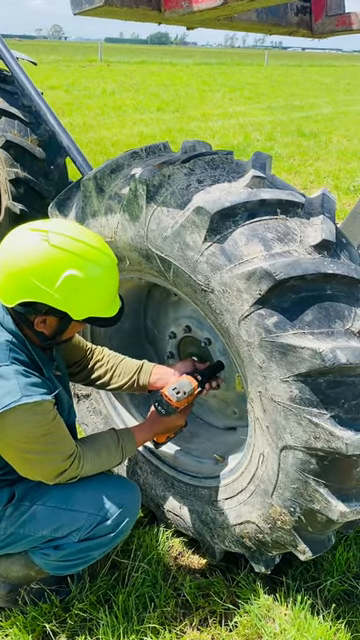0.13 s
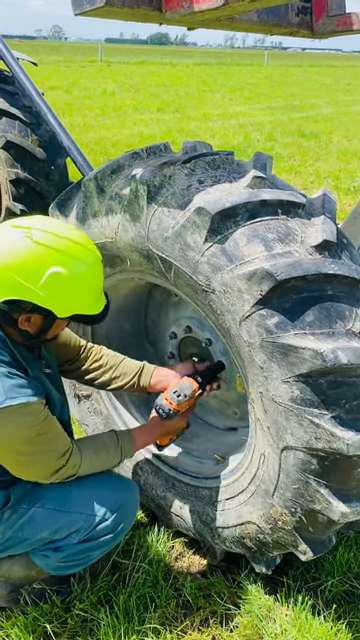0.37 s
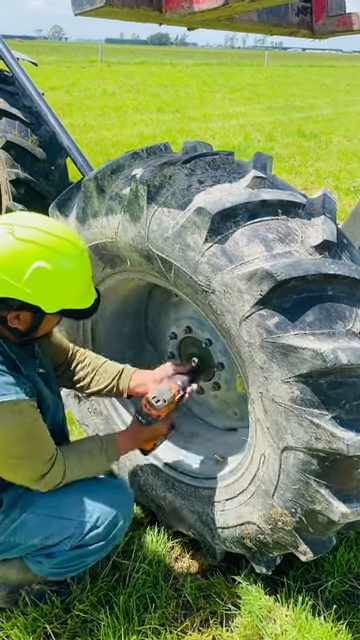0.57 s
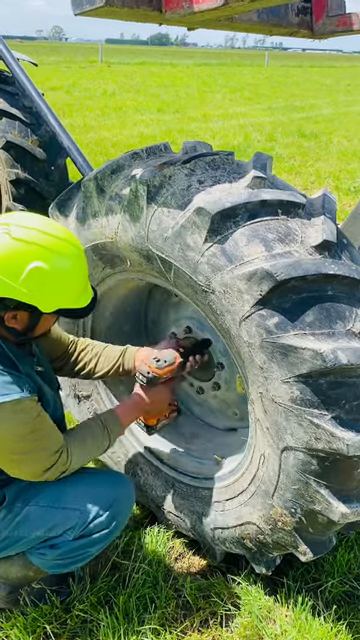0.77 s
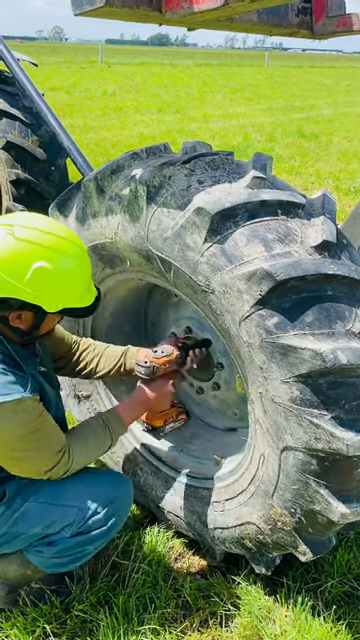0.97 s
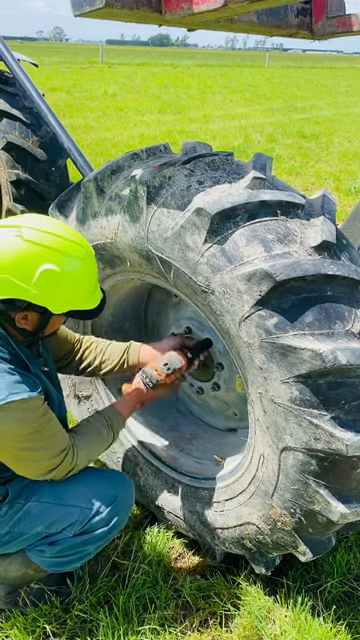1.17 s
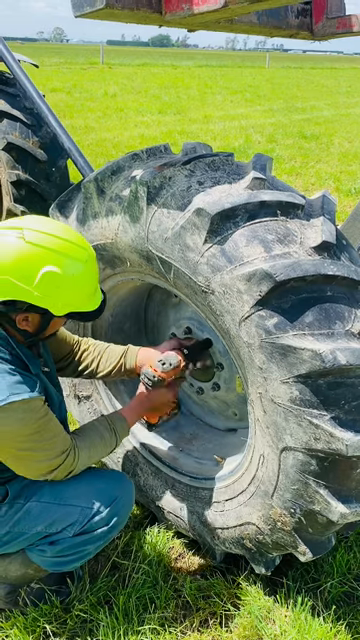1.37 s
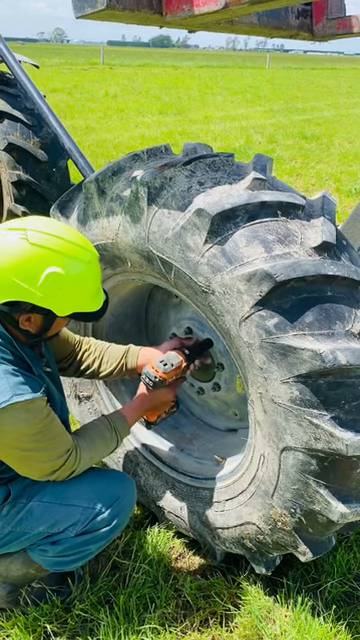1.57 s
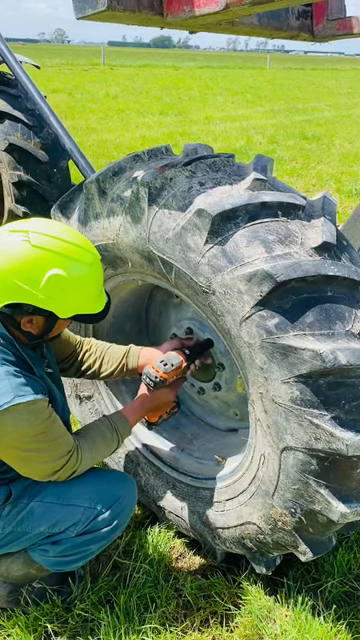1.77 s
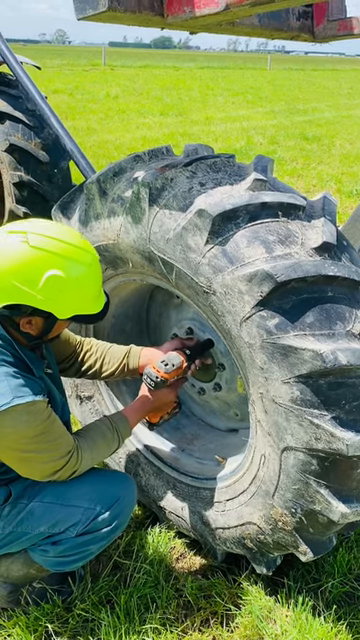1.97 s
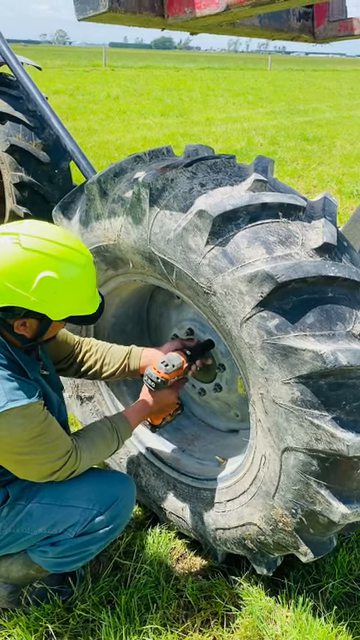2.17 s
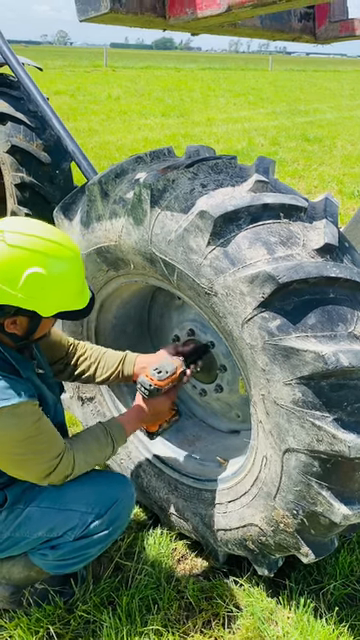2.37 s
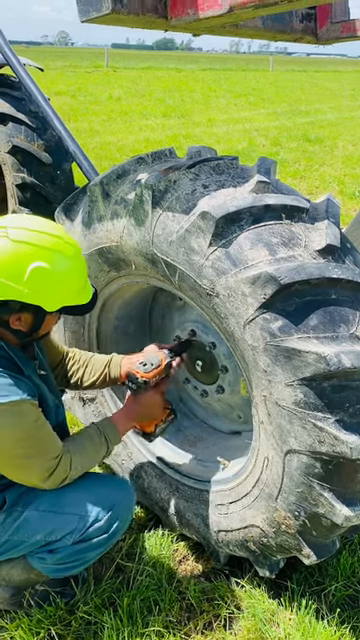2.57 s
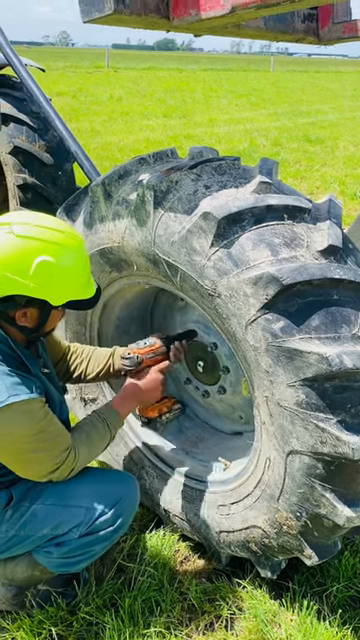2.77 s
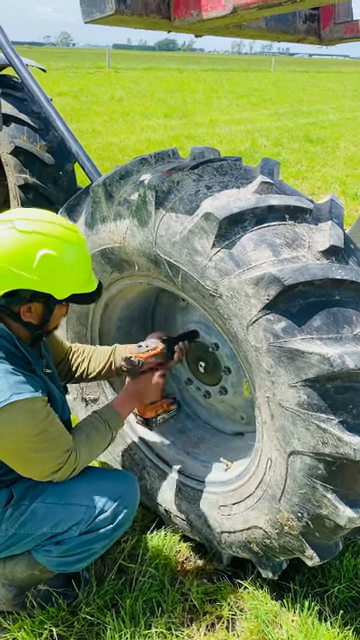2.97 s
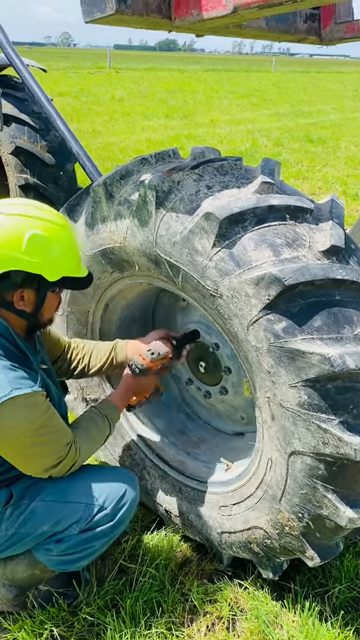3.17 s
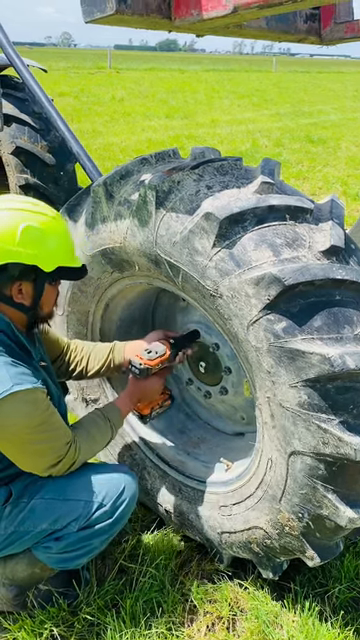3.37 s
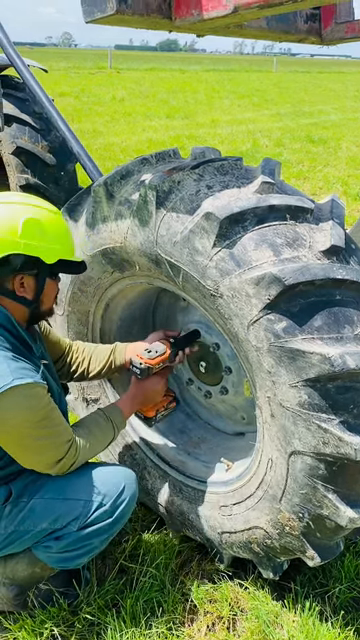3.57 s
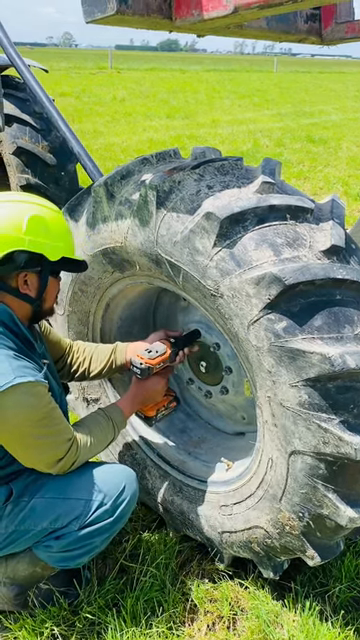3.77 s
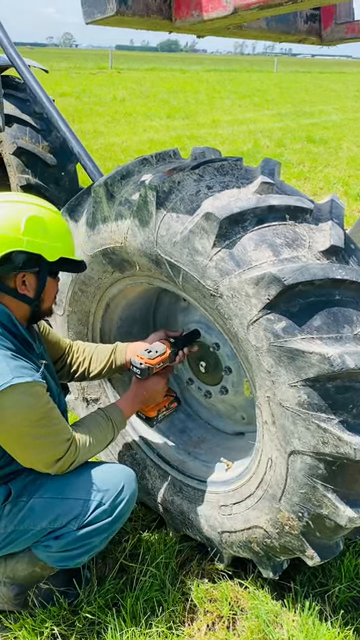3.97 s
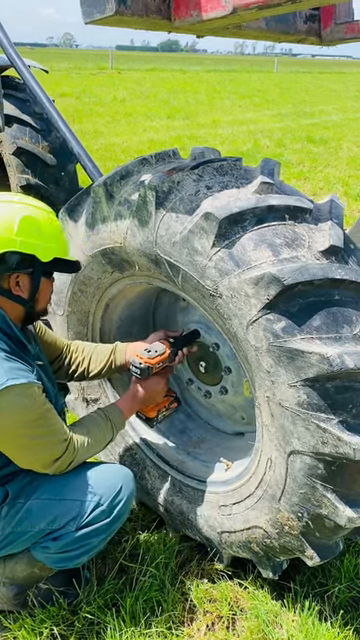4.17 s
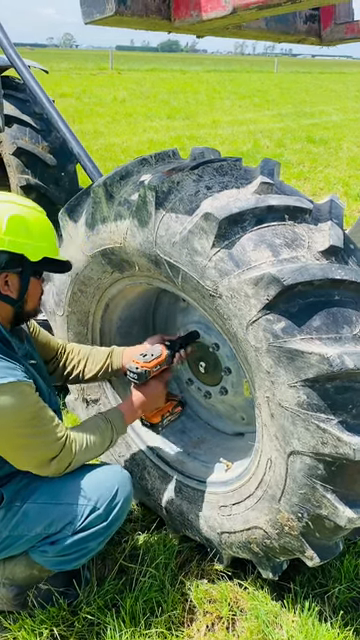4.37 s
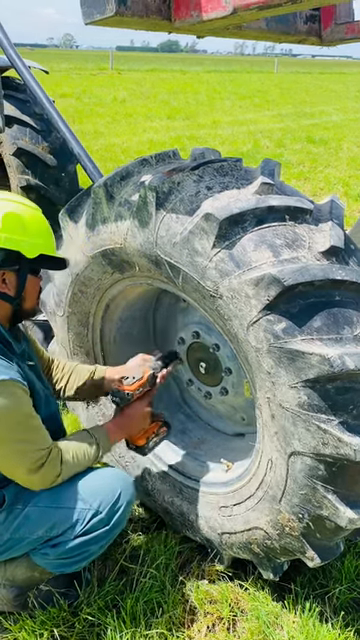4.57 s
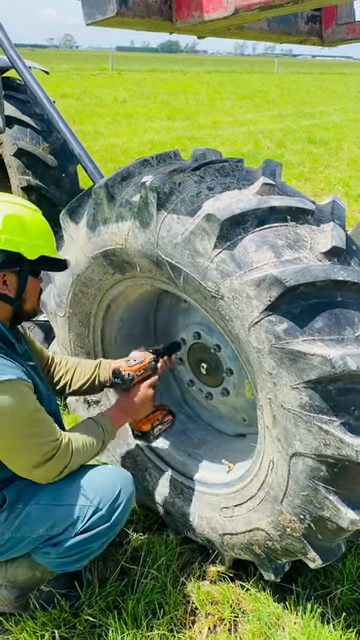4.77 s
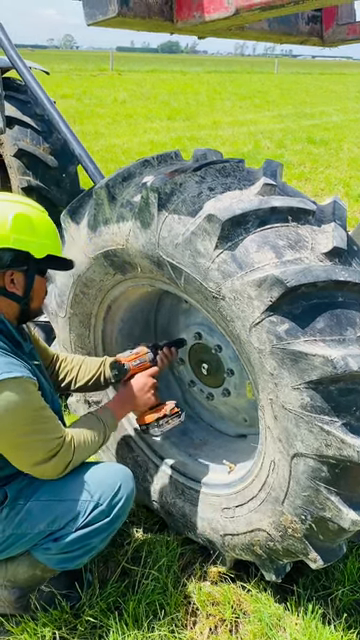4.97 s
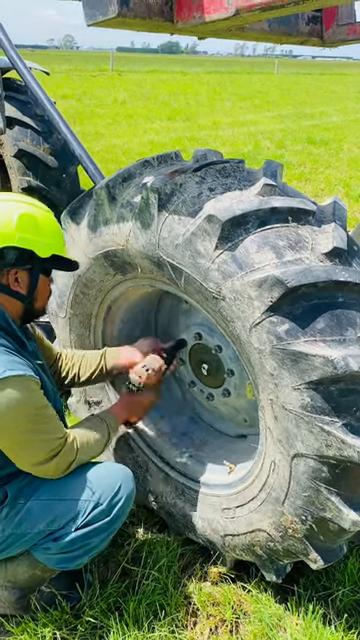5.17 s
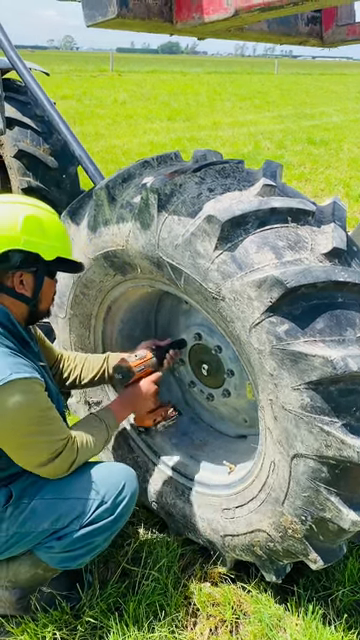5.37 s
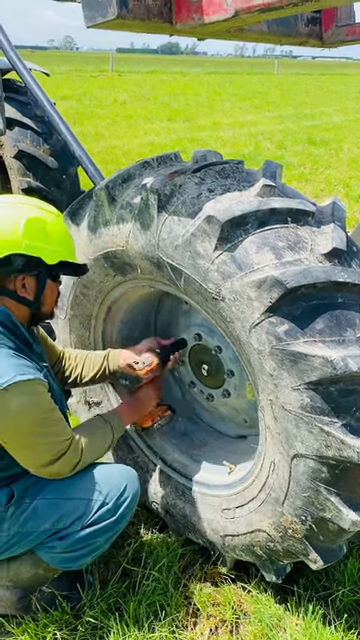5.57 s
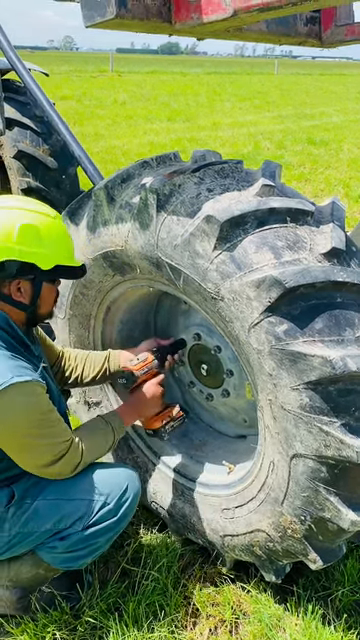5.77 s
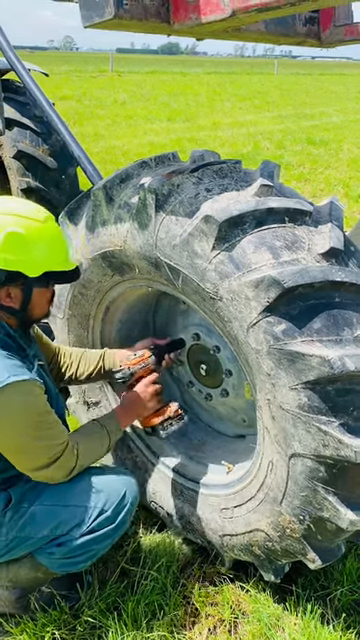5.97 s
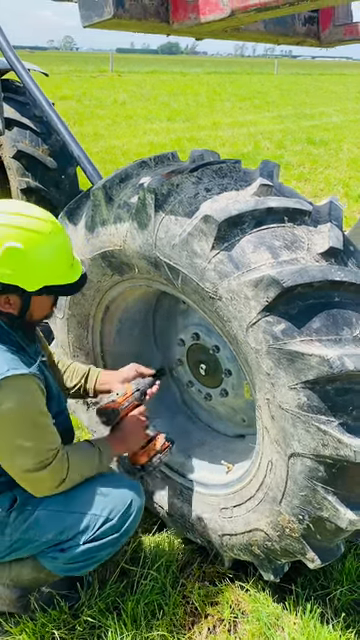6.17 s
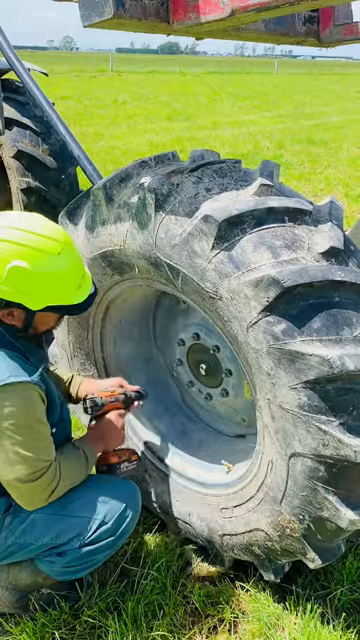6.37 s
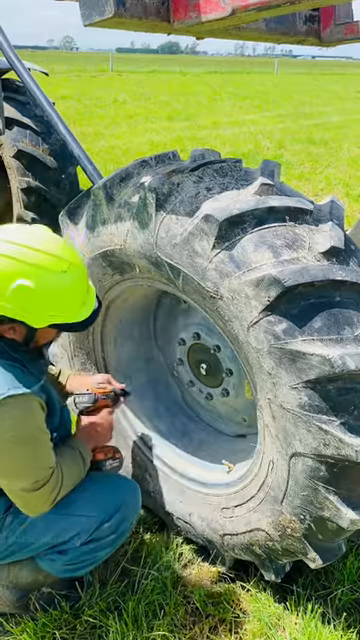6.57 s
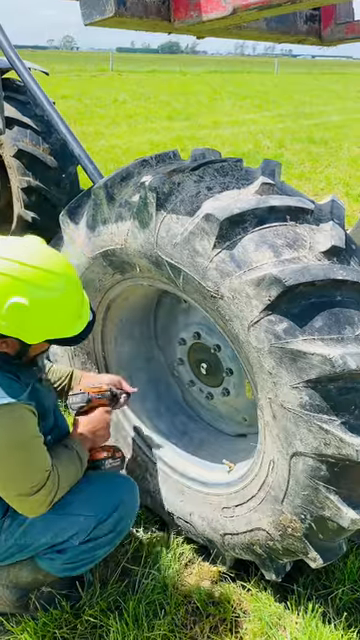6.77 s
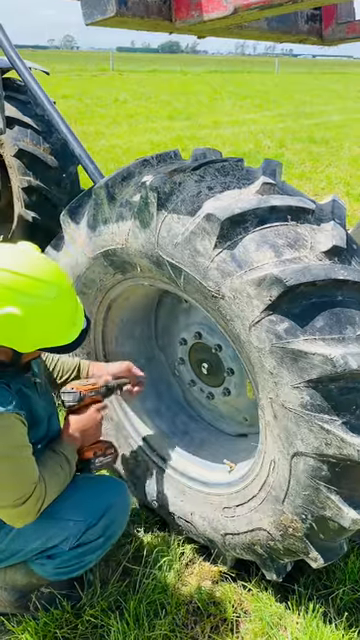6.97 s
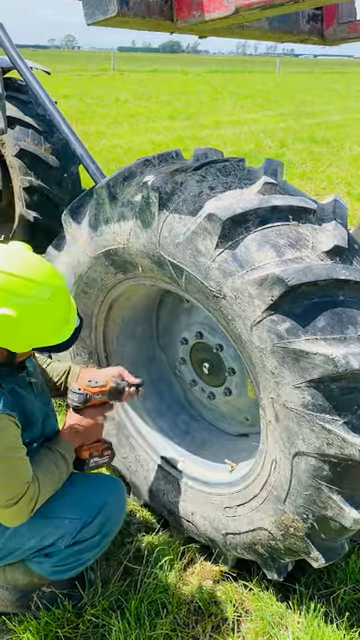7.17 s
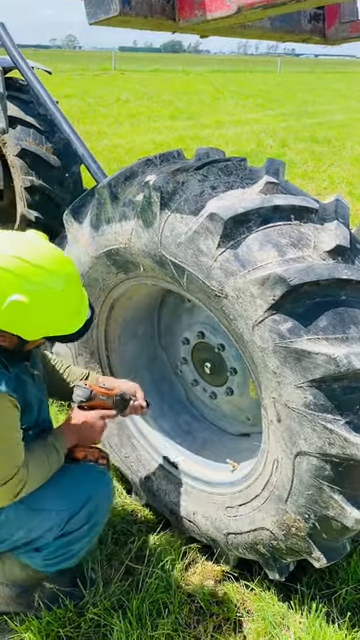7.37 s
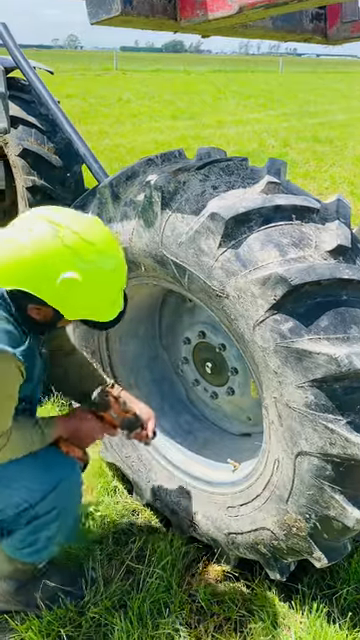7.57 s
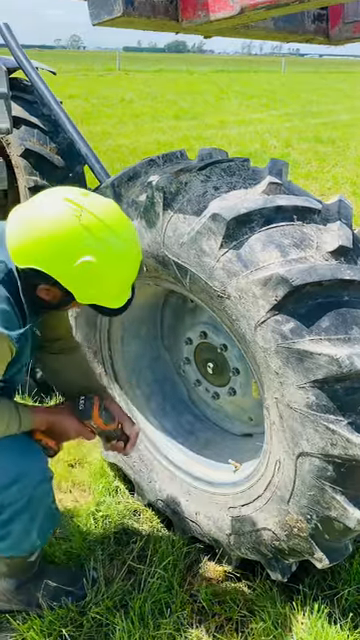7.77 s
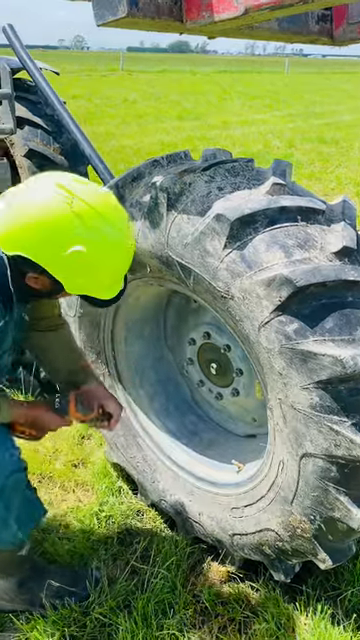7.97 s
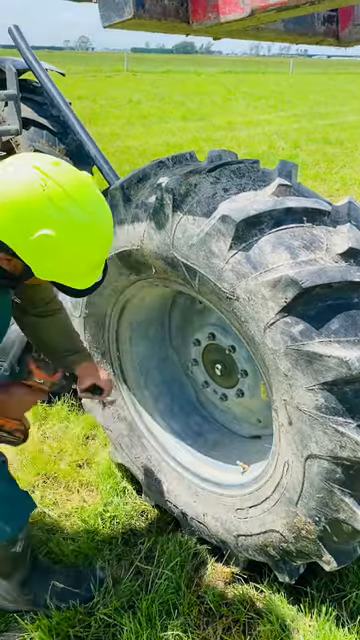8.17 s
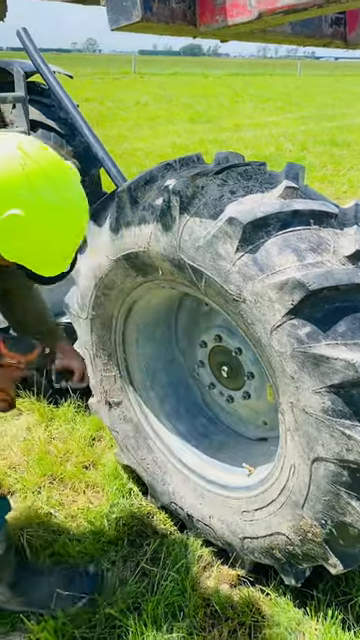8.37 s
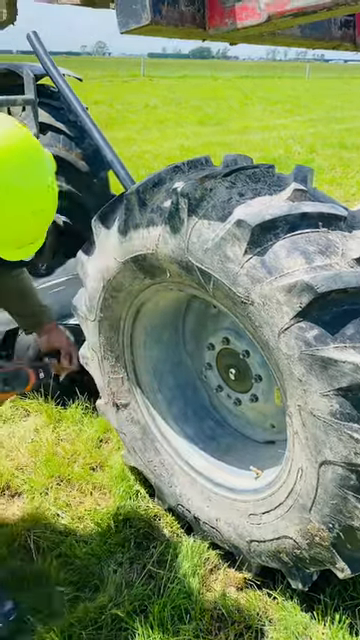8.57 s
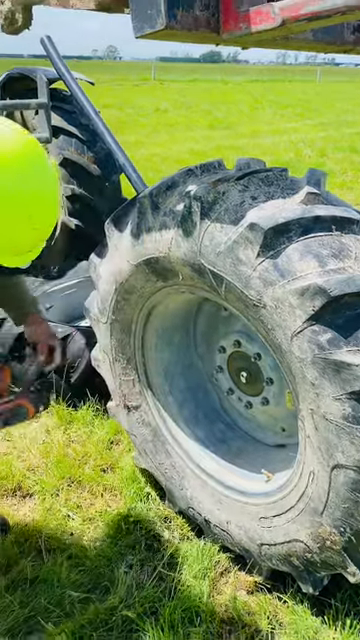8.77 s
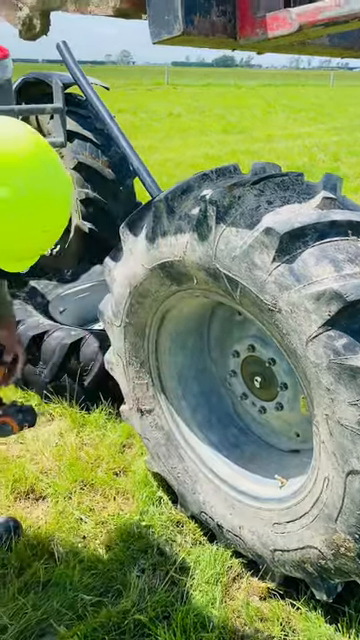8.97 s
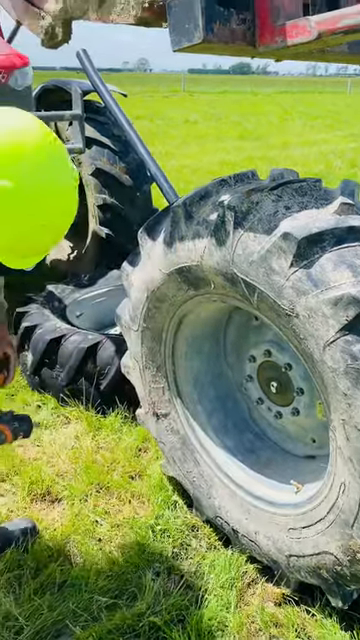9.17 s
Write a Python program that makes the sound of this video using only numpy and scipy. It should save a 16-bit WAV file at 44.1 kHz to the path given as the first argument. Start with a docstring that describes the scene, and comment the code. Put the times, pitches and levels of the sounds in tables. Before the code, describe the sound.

A cordless impact wrench hammers steel wheel nuts in four harsh rattling bursts, clinking between them, while a diesel engine idles in a breezy field.

```python
"""Hammering is heard at once: a cordless impact wrench works four wheel nuts of a farm tyre, outdoors.
Each blow is a chattering force on the damped modes of socket, hub and steel rim; lighter contacts clink
between nuts, and motor and gears whir as grainy noise. Some way off a four-cylinder diesel idles: timed
knocks and valve ticks on resonances, steady hums and a pulsing rush. Wind is low noise in gusts, with
short thumps. The sound is spread over two channels, left and right."""
import sys
import numpy as np
from scipy import signal
from scipy.fft import rfft, irfft, next_fast_len
from scipy.io import wavfile
from scipy.ndimage import map_coordinates

SR = 44100
rng = np.random.default_rng(int(sys.argv[2]) if len(sys.argv) > 2 else 0)


def write(x):
    x = np.atleast_2d(x).T
    wavfile.write(sys.argv[1], SR, np.round(np.clip(x, -1, 1) * 32767).astype(np.int16))

N = 406602


def amp(db):
    """Decibel law: 20 dB is a factor of ten in amplitude."""
    return 10 ** (np.asarray(db) / 20)


def unit(x):
    """Normalization: x at rms 1."""
    return x / np.sqrt(np.mean(x ** 2) + 1e-20)


def along(points, hz):
    """Interpolation of (Hz, value) points on a logarithmic frequency axis."""
    point_hz, value = np.transpose(points)
    return np.interp(np.log(hz + 1), np.log(point_hz + 1), value)


def curve(rows):
    """Envelope: a (s, dB) table as gain per sample, at -150 dB outside its span."""
    s, db = np.transpose(rows)
    return amp(np.interp(np.arange(N) / SR, s, db, -150, -150))


def wobble(rate):
    """Slow random modulation: a smooth curve through `rate` random knots a second."""
    knots = rng.standard_normal(int(N * rate / SR) + 4)
    return map_coordinates(knots, [np.arange(N) * rate / SR])


def filtered(x, response):
    """Linear filtering: the spectrum of x times a complex response of frequency."""
    n = x.shape[-1]
    padded = next_fast_len(n + SR // 2)
    hz = np.fft.rfftfreq(padded, 1 / SR)
    return irfft(rfft(x, padded) * response(hz), padded)[..., :n]


def noise(spectrum):
    """Coloured noise: two unrelated signals of one spectral shape, rms 1."""
    white = rng.standard_normal((2, N))
    return unit(filtered(white, lambda hz: amp(along(spectrum, hz))))


def ringing(modes, force):
    """Forced resonance: a rough force drives damped modes; a steady force of 1 gives rms 1."""
    def response(f):
        total = 0
        for k, (hz, width, db) in enumerate(modes):
            damping = 1j * f * width
            total = total + (-1) ** k * amp(db) * damping / (hz * hz - f * f + damping)
        return total / np.sqrt(np.mean(abs(total) ** 2))
    return filtered(force * rng.standard_normal((2, len(force))), response)


def strokes(s, db, rise, hold, t60):
    """Superposed contacts: each force rises, holds and decays 60 dB in t60 seconds; energies add."""
    t = np.arange(SR // 10) / SR
    shape = (1 - np.exp(-t / abs(rise))) * amp(-60 * np.maximum(t - hold, 0) / t60)
    at = np.round(np.asarray(s) * SR).astype(int)
    inside = at < N
    energy = np.bincount(at[inside], amp(db)[inside] ** 2, N)
    return np.sqrt(abs(signal.fftconvolve(energy, shape ** 2)[:N]))


def struck(modes, s, db, swing, uneven_db, step=2.425):
    """Free vibration: blows start decaying modes, phased differently in the shared and the apart part."""
    t = np.arange(SR // 6) / SR
    k = np.arange(len(modes))[:, None]
    hz, width = np.array(modes)[:, :1], np.array(modes)[:, 1:2]
    fade = np.exp(-np.pi * width * t) * (1 - np.exp(-(t / swing) ** 2))
    phases = np.array([step * k, k + 1])  # shared part, apart part
    rings = fade * np.sin(2 * np.pi * hz * t + phases)
    gains = amp(np.transpose(db) + rng.normal(0, uneven_db, (len(s), len(modes))))  # db: a row a mode
    out = np.zeros((2, N + SR))
    for at, gain in zip(np.round(s * SR).astype(int), gains):
        out[:, at:at + len(t)] += gain @ rings
    return out[:, :N]


# gusts of wind: start_s, level_db
GUSTS = [(0, -45), (.6, -52.5), (1.1, -42.5), (1.6, -46), (2.62, -47), (2.75, -38), (3.12, -37.5),
         (3.25, -49.5), (3.5, -42.5), (4.3, -55.5), (4.8, -47), (5.3, -50), (5.7, -41.5), (6.2, -51),
         (6.7, -44.5), (7.2, -59), (8, -49), (9.22, -49)]
# colour of the wind rumble: pitch_hz, relative level_db
BUFFET = [(15, -25), (40, -2.5), (70, 2.5), (130, -2.5), (250, -6.5), (500, -29), (900, -61)]
# thumps of single lumps of air: centre_s, pitch_hz, level_db
THUMPS = [(0.384, 118, -30), (0.49, 85, -34), (1.03, 181, -30.5), (1.108, 130, -31), (1.135, 48, -35),
          (1.482, 56, -34), (1.58, 79.4, -31.5), (1.701, 59.5, -36), (2.758, 70.4, -27),
          (3.001, 75.8, -25.5), (3.046, 89.2, -33), (3.126, 76, -25), (3.353, 62, -33), (4.813, 201, -32.5),
          (4.82, 300, -36), (5.29, 90, -37), (5.442, 125, -34), (6.719, 90.5, -35)]


def wind():
    """Turbulent pressure: low noise swells in gusts, and lumps of air thump for a couple of swings."""
    out = curve(GUSTS) * unit(amp(3.5 * wobble(14)) * noise(BUFFET))
    half = 1500  # samples on either side of the centre
    t = np.arange(-half, half) / SR
    for s, hz, db in THUMPS:
        first = round(s * SR) - half
        thump = amp(db) * np.cos(2 * np.pi * hz * t) * np.exp(-(t * hz / .9) ** 2)
        out[:, first:first + len(t)] += thump
    return out


CYCLE_HZ = 7.5  # four-stroke cycles a second
# modes of the exhaust pipe (first row) and engine block: pitch_hz, width_hz
BLOCK = [(270, 10.2), (830, 64), (990, 22.5), (1140, 46), (1435, 54), (2200, 64)]
# cylinders: firing point (share of the cycle), then level_db of each BLOCK mode
CYLINDERS = [(0.2, -68.5, -44.5, -43, -52.5, -61, -56), (0.449, -50, -42.5, -56.5, -48.5, -38.5, -46),
             (0.699, -49.5, -44, -49, -40, -57, -45), (0.948, -36.5, -39, -69, -65.5, -48, -43.5)]
# valve gear modes: pitch_hz, width_hz, relative level_db
VALVES = [(3430, 65, 4.5), (4170, 530, -1.5), (6000, 4200, -13)]
# steady tones of shafts and pump: pitch_hz, rms level_db before the engine gain
HUMS = [(91.5, -58), (156.1, -58), (181, -56), (311.6, -53), (1050, -65.5), (2013, -65.5)]
# colour of the fan and exhaust rush: pitch_hz, relative level_db
RUSH = [(35, -32), (60, -7), (119, -8.5), (188, -8.5), (235, -13), (300, -1.5), (341, -7.5), (454, -8),
        (591, -15.5), (1020, -13), (1620, -21), (2070, -19), (3070, -26), (6490, -44.5), (11500, -64),
        (22000, -100)]
# gain of the whole engine: start_s, level_db
ENGINE_GAIN = [(0, -4.5), (1, -1.5), (2.5, -1.5), (4.5, -2.5), (5.3, -0.5), (6.2, -1.5), (7.5, 0.5),
               (9.22, 1.5)]


def engine():
    """Periodic excitation: firings knock the block and swell the pipe, valves tick, shafts hum, a rush pulses."""
    t = np.arange(N) / SR
    cycles = np.arange(int(N / SR * CYCLE_HZ) + 1)[:, None]
    share, *levels = np.transpose(CYLINDERS)
    fires = ((cycles + share) / CYCLE_HZ).ravel()
    levels = np.tile(levels, len(cycles))
    pipe = struck(BLOCK[:1], fires, levels[:1], 0.015, uneven_db=2.5)
    block = struck(BLOCK[1:], fires, levels[1:], 0.0023, uneven_db=0.2)

    # two ticks a firing, the second softer on average
    tick = np.arange(8 * len(cycles))
    tick_s = (tick + 0.33) / (8 * CYCLE_HZ)
    tick_db = rng.normal(-58.0, 2.65, len(tick)) - 3 * (tick % 2)
    valves = ringing(VALVES, strokes(tick_s, tick_db, 0.00048, 0.005, 0.18))

    hum = 0
    for hz, db in HUMS:
        level = np.sqrt(2) * amp(db + 1.95 * wobble(4.0))
        hum = hum + level * np.sin(2 * np.pi * hz * t + 0.6 * wobble(5))

    puffs = 1 + 0.14 * np.cos(8 * np.pi * CYCLE_HZ * t - 5.3)  # one swell a firing
    rush = amp(-45.0) * puffs * amp(.7 * wobble(12)) * noise(RUSH)
    return curve(ENGINE_GAIN) * (pipe + block + valves + hum + rush)


def motor_level(full_s, brake_s, full_db, brake_db, coast_db_per_s):
    """Rotor inertia: (s, dB) points of one run as it spins up, runs, brakes and coasts."""
    slow_s, slow_db = brake_s + 0.018, brake_db - 12
    coast_s = 0.076
    return [(full_s - .04, full_db - 30.532), (full_s, full_db), (brake_s, brake_db), (slow_s, slow_db),
            (slow_s + coast_s, slow_db - coast_s * coast_db_per_s)]


# work on each nut: start_s
NUT_STARTS = [0, .5, 2.5, 4.5]


def nut_ringing(modes, force):
    """Forced resonance in spells: a rough force drives the modes, coloured as on the nut at work."""
    bounds = np.round(np.array(NUT_STARTS[1:]) * SR).astype(int)
    spells = []
    for k, spell in enumerate(np.split(force, bounds)):
        on_nut = [(hz, width, nut_db[k]) for hz, width, *nut_db in modes]
        spells.append(ringing(on_nut, spell))
    return np.hstack(spells)


# motor runs: full_speed_s, brake_s, level_db at each of the two, coasting fall (dB a second)
RUNS = [(0, 0.311, -25.5, -29, 400), (1.321, 2.28, -26.5, -29, 150), (3.392, 4.318, -28, -29, 353),
        (5.616, 5.834, -31, -26, 450)]
# socket sliding off the anvil: start_s, level_db
SLIDE = [(6.73, -66), (6.745, -52), (6.8, -52.5), (6.86, -61), (6.92, -60), (6.96, -75)]
# colour of the gear noise: pitch_hz, relative level_db
GEARS = [(300, -8.5), (900, -3.5), (2000, -4), (5500, 1), (8000, -7.5), (11000, -5.5), (16000, -25)]
# steel modes of the hub, also played by steel(): pitch_hz, width_hz, relative level_db on each of four nuts
HUB = [(1818, 43, 3.5, 6, -12, -6), (1886, 68, 7, 2.5, 2.5, 5), (2014, 38, -8, 5, -1.5, -28),
       (2125, 51, -11, 4.5, -3, -27), (2388, 36, 1, 6.5, 2.5, 3), (2528, 50, 10, 0, -21, -1),
       (2657, 77, -2, 8.5, -15, -4), (2918, 40, -15, -24, 5.5, -1), (3063, 67, 5.5, 7, 2, 10),
       (3222, 35, -1, 3.5, 2, 9), (3356, 28, 2, 1.5, -0.5, 0.5), (3660, 29, -16, -4, -4, -2.5)]
# the same columns for the socket, also played by steel()
SOCKET = [(4294, 22, -7, 1.5, 0, 0), (4425, 55, -3, 7, 2.5, 2), (4515, 60, 2, 8.5, 4.5, 5),
          (4920, 47, 4, 9.5, 5.5, 2), (5194, 65, 1.5, 9.5, 6, 0), (5507, 23, 1, 5.5, -11, -16),
          (5600, 46, -2, 4, 5.5, -20), (5686, 60, 1, -18, 3, -0.5), (6270, 66, -20, 5.5, -16.5, -5),
          (7160, 94, -3, 0, 0, -10), (7350, 44, 0, 3, -16, -24), (7660, 56, -1, -2, 0.5, -25),
          (8300, 60, -1, 4.5, -10, -10), (8840, 75, -8, -0.5, -4.5, -5)]


def whir():
    """Friction excitation: motor and gears grind in grains and keep the steel singing; a socket scrape joins."""
    level = sum(curve(motor_level(*run)) for run in RUNS) + curve(SLIDE)
    grains = level * amp(2.24 * wobble(250))
    return grains * amp(-1.5) * noise(GEARS) + amp(-6.5) * nut_ringing(SOCKET + HUB, grains)


# steel modes of the rim: pitch_hz, width_hz, relative level_db on each of four nuts
RIM = [(372, 71, -13, -5, -8.5, -1.5), (596, 104, -27, 3.5, -14.5, -15), (710, 240, -13, -16, -6, -20),
       (772, 47.3, 6, 8.5, 4, -0.5), (837, 77, -1, -26, -8, 2.5), (984, 87, -21, 5, 3.5, 1),
       (1330, 5.7, -22, -22, -22.5, -27.5)]
# broad rattle around the rim modes: pitch_hz, relative level_db
RIM_RATTLE = [(300, -41), (550, -19), (750, -10.5), (1100, -4.5), (1400, -42), (2000, -49)]
# the same columns for the hub
HUB_RATTLE = [(900, -51), (1400, -0.5), (1900, 2), (3200, -0.5), (4000, -10.5), (5000, -35)]
# the same columns for the socket
SOCKET_RATTLE = [(3000, -27.5), (4000, -4), (5500, -4.5), (8000, -5.5), (10000, -8), (12000, -6),
                 (16000, -7)]


def steel(s, socket_db, rim_db, hub_db, chatter_s, dies_s):
    """Impact on coupled bodies: socket and hub ring and rattle promptly, the heavy rim swings up later."""
    s = s + rng.normal(0, .00008, len(s))  # slight timing scatter, in seconds
    nut = np.searchsorted(NUT_STARTS, s, "right") - 1

    def favoured(modes):
        """Modal coupling: each nut drives the modes its own way, in dB."""
        return np.array(modes)[:, 2 + nut]

    chatter = amp(1.6 * wobble(700))  # loose fits bounce many times in one blow
    socket = chatter * strokes(s, socket_db, 0.00027, chatter_s, dies_s)
    hub = chatter * strokes(s, hub_db, 0.00034, 0.49 * chatter_s, 1.66 * dies_s)
    rim = strokes(s, rim_db, 0.00081, 0.0039, 0.0097)
    rattle = socket * amp(-0.67) * noise(SOCKET_RATTLE)
    rattle += hub * amp(-5.0) * noise(HUB_RATTLE)
    rattle += rim * amp(-14.0) * noise(RIM_RATTLE)
    driven = amp(-6.0) * nut_ringing(SOCKET, socket) + amp(-8.5) * nut_ringing(HUB, hub)

    low_rim, high_rim = RIM[:5], RIM[5:]
    rings = struck(SOCKET, s, socket_db - 13 + favoured(SOCKET), 0.0016, uneven_db=1.5)
    rings += struck(HUB, s, hub_db - 11.5 + favoured(HUB), 0.0019, uneven_db=2.5)
    rings += struck(low_rim, s, rim_db + favoured(low_rim) + 3.0, 0.0064, uneven_db=2.0, step=3.77)
    rings += struck(high_rim, s, rim_db + favoured(high_rim) + 3.5, 0.0042, uneven_db=1.5)
    return rattle + driven + rings


# force of the blows: start_s, socket level_db, rim level_db, hub level_db,
# extra level_db of every second blow on the socket, the same on the hub
FORCE = [(0, -21, -30, -22.5, -6, 1), (.12, -19, -23, -23, 1.5, -3), (.26, -15.5, -28.5, -21.5, -3, 1),
         (1.32, -17.5, -27, -22, 5.5, -2), (1.41, -19.5, -30, -22, -1, 0), (1.47, -21, -22, -22.5, 9, -5),
         (1.6, -19, -26, -22, 5, 4), (1.72, -21.5, -29, -25, 1, 5), (1.8, -19, -26.5, -19, 0, -5),
         (1.899, -21, -28, -23, 4, 2), (2.0, -22.5, -29, -23, -2, 3), (2.1, -21, -25, -24.5, 1, -3),
         (2.26, -24, -30.5, -24.5, -5, -9), (3.39, -15.5, -23, -25.5, -4, -9),
         (3.43, -16.5, -17.5, -19.5, -3, 3), (3.6, -13.5, -19, -20, -2.5, 2), (3.7, -18, -21, -20, -1, 1),
         (3.85, -16, -22.5, -20, 1.5, 2), (4, -20.5, -22, -24, 3, 3.5), (4.15, -20, -26, -25.5, 5, 6),
         (4.29, -22.5, -26.5, -23.5, 3, 1), (5.61, -18, -24, -17, 1, 8), (5.645, -20, -14, -19.5, 0, 0),
         (5.73, -17, -28, -22.5, 4, -6), (5.8, -17, -27, -22.5, 5, -12)]
# blows that differ from their neighbours on the socket: start_s, added level_db
ODD_BLOWS = [(1.6, 6), (1.711, 5.5), (1.744, 0), (1.761, 2), (1.892, 4), (2.024, 3.5), (3.544, 1),
             (3.594, -9.5), (3.779, 3), (3.812, -4), (3.847, 1), (3.882, 2), (3.97, 4), (4.126, -4),
             (5.688, 3), (5.756, 4)]


def hammer(speed):
    """Rotary impact: one blow for every half turn of the hammer, its two lugs taking turns."""
    s, rate = np.transpose(speed)
    t = np.arange(s[0], s[-1], 1 / SR)
    struck_so_far = np.cumsum(np.interp(t, s, rate)) / SR
    k = np.arange(int(struck_so_far[-1]) + 1)
    at = np.interp(k, struck_so_far, t)
    force_s, *columns = np.transpose(FORCE)
    socket_db, rim_db, hub_db, second_db, hub_second_db = [np.interp(at, force_s, c) for c in columns]
    odd_db = sum(db * (abs(at - odd_s) < .006) for odd_s, db in ODD_BLOWS)
    lug = k % 2 - .5
    uneven, hub_uneven = rng.normal(0, 0.52, (len(k), 2)).T  # dB from blow to blow
    socket_db = socket_db + second_db * lug + odd_db + uneven
    rim_db = rim_db + 0.51 * second_db * lug
    hub_db = hub_db + hub_second_db * lug + hub_uneven
    return [at, socket_db, rim_db, hub_db]


# hammer speed, one table a nut, from first blow to trigger release: start_s, rate (blows a second)
SPEED = [
    [(.0048, 59.7), (.13, 61.4), (.255, 59.6)],
    [(1.3189, 48.7), (1.36, 58.3), (1.43, 58.1), (1.5, 58.4), (1.57, 56.0), (1.65, 52.5), (1.72, 58.6),
     (1.8, 61.4), (1.9, 61.8), (1.97, 61.6), (2.04, 51.6), (2.1, 57.8), (2.17, 60.7), (2.255, 56.5)],
    [(3.39, 55.0), (3.46, 59.6), (3.55, 60.3), (3.63, 58.5), (3.69, 60.6), (3.76, 58.6), (3.83, 58.8),
     (3.91, 56.3), (3.99, 56.2), (4.07, 59.1), (4.15, 58.8), (4.22, 59.4), (4.286, 51.0)],
    [(5.6158, 52.3), (5.66, 56.6), (5.72, 59.8), (5.793, 59.1)],
]
# last blows while the hammer slows: start_s, socket level_db, rim level_db, hub level_db
LAST_BLOWS = [(.273, -18.5, -24.5, -21.5), (.2994, -32, -33, -34), (2.2714, -36, -48, -24.5),
              (2.286, -35, -42, -32), (4.3116, -24, -28, -25.5), (5.8097, -20, -24, -21.5),
              (5.8322, -18.5, -18.5, -19.5)]
# socket touching a nut or the anvil: start_s, socket level_db, rim level_db, hub level_db
CLINKS = [(.3274, -59, -42, -41), (0.3352, -49, -45, -34), (0.3466, -38, -50, -38),
          (0.3595, -43, -46, -39.5), (0.751, -49, -55, -47), (0.777, -41, -52, -38),
          (0.7863, -45, -56, -46), (1.282, -36.5, -43, -36), (1.3124, -40.5, -39, -33),
          (2.305, -35, -48, -31), (2.3184, -43, -55, -39), (2.33, -42, -60, -33), (2.346, -38, -62, -38),
          (2.6804, -45, -34, -33.5), (2.716, -48, -41, -37.5), (3.0599, -44.5, -46, -47),
          (3.367, -25.5, -26.5, -27), (4.791, -48, -61, -41), (4.8219, -35.5, -25.5, -32),
          (4.844, -41, -35, -37.5), (5.4307, -45, -39, -32.5), (5.5875, -30.5, -30.5, -32),
          (5.607, -39, -34, -25), (6.7363, -37, -54, -43), (6.7665, -47, -55, -53), (6.897, -41, -52, -45),
          (6.9298, -31.5, -49, -41), (6.941, -43, -55, -60), (8.139, -45.5, -50, -55)]


def wrench():
    """Contact duration: hammer blows chatter for a while, light touches are short; both ring the same steel."""
    blows = np.hstack([hammer(speed) for speed in SPEED] + [np.transpose(LAST_BLOWS)])
    hammering = steel(*blows, chatter_s=0.0049, dies_s=0.023)
    clinking = steel(*np.transpose(CLINKS), chatter_s=0.00053, dies_s=0.032)
    return hammering + clinking


# likeness of the two channels: pitch_hz, coherence (1 is alike)
ALIKE = [(60, .98), (180, .94), (600, .98), (1800, .93), (2700, .68), (3700, .35), (4800, .82), (5300, .5),
         (7000, .75), (10000, .65), (11500, .95), (16000, .96)]
# phase difference of left and right channel, the top treble nearly in opposition: pitch_hz, phase (radians)
PHASE_DIFFERENCE = [(0, 0), (2150, 0), (2760, 2), (3360, 1.2), (4220, 3.6), (4650, 3.1), (5170, 3.7),
                    (5430, 6.8), (6030, 6.6), (6720, 7.4), (9820, 8.2), (11500, 9.35), (16500, 9.45)]


def stereo(sound, side):
    """Interchannel coherence: a shared part and an apart part mix into left and right, shifted in phase."""
    def turn(hz):
        """Coherence as a mixing angle in radians."""
        return np.arccos(np.clip(along(ALIKE, hz), -1, 1)) / 2

    def left(hz):
        """Half the level and phase difference, for the left channel."""
        return amp(along(side, hz) / 2) * np.exp(.5j * along(PHASE_DIFFERENCE, hz))

    shared, apart = filtered(sound, lambda hz: np.array([np.cos(turn(hz)), np.sin(turn(hz))]))
    pair = np.array([shared + apart, shared - apart])
    return filtered(pair, lambda hz: np.array([left(hz), 1 / left(hz)]))


# balance of engine and wind: pitch_hz, left minus right level_db
YARD_SIDE = [(60, -0.5), (240, -3), (950, -0.5), (3770, -3), (15000, 2)]
# balance of the wrench at the wheel: pitch_hz, left minus right level_db
WRENCH_SIDE = [(60, -2.5), (130, 3.5), (290, -1.5), (640, -3), (1410, -3.0), (3100, -2.0), (6820, 0.5),
               (15000, 0.5)]


def scene():
    """Superposition: the yard and the wrench add in two channels, each with its own balance."""
    yard = stereo(wind() + engine(), YARD_SIDE)
    return yard + stereo(whir() + wrench(), WRENCH_SIDE)


TOP_HZ = 16000  # nothing passes above


def record(dry):
    """Soft saturation and band limiting: peaks round off, then the top 200 Hz of the band fade out."""
    pair = dry / (1 + abs(dry / .75) ** 4) ** (1 / 4)
    return filtered(pair, lambda hz: np.clip((TOP_HZ - hz) / 200, 0, 1) ** 2)


dry = scene()
out = record(dry)
write(out)
```